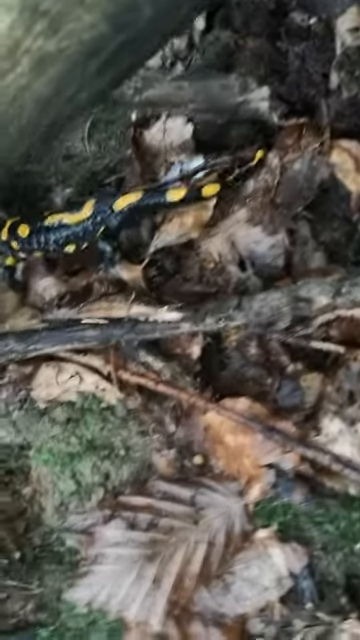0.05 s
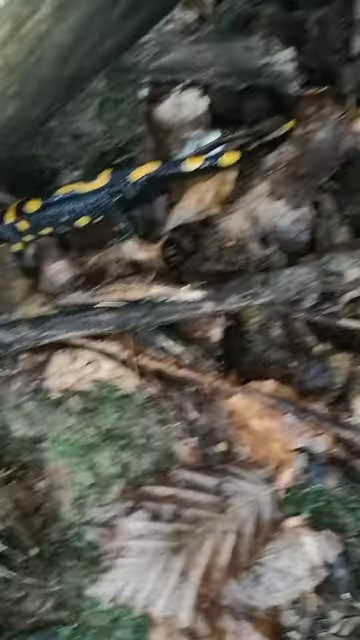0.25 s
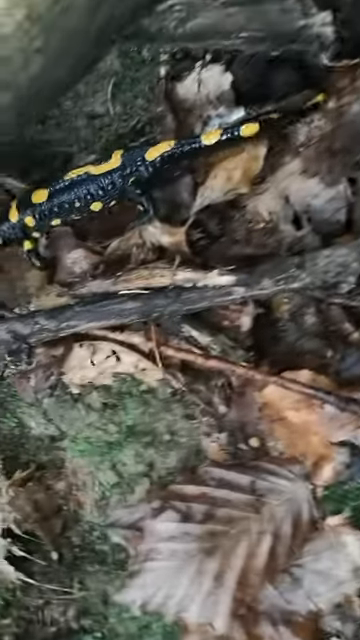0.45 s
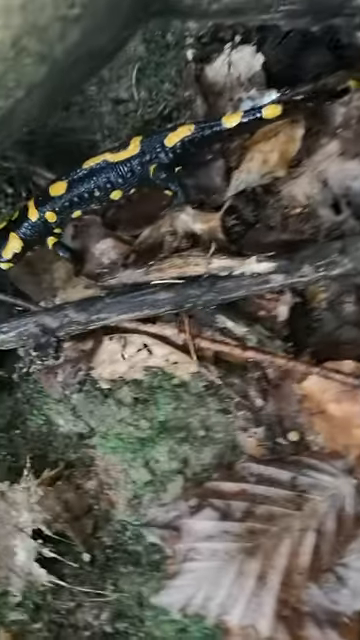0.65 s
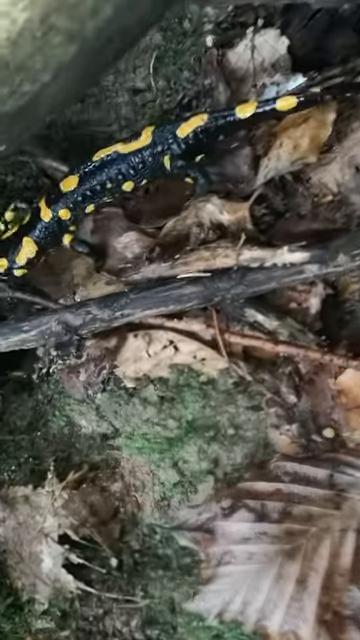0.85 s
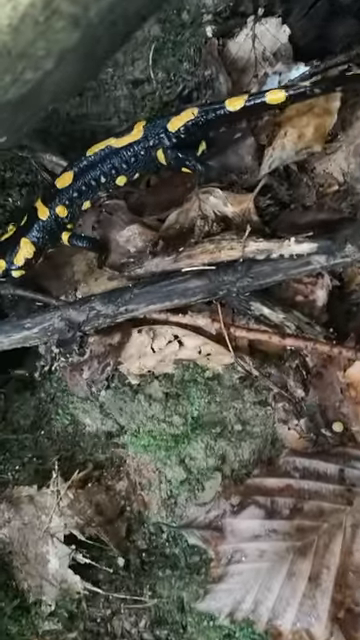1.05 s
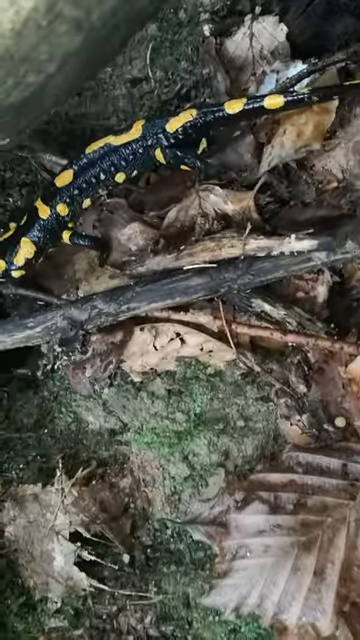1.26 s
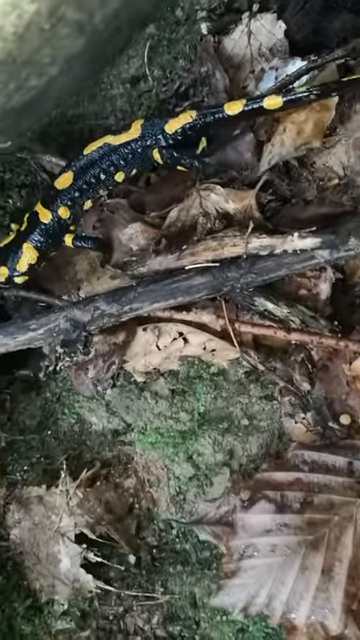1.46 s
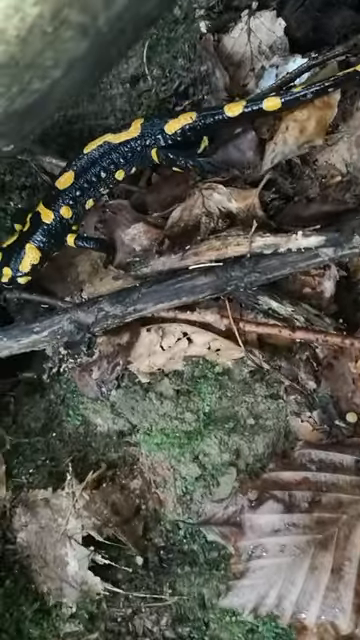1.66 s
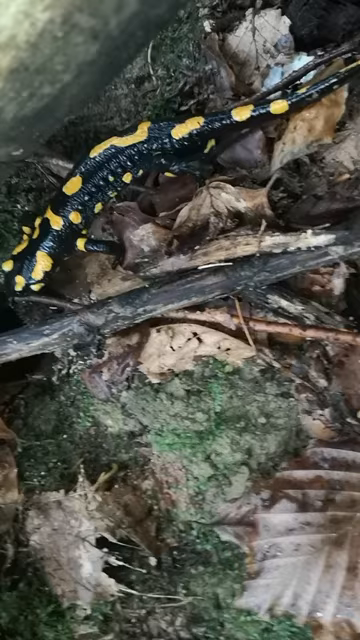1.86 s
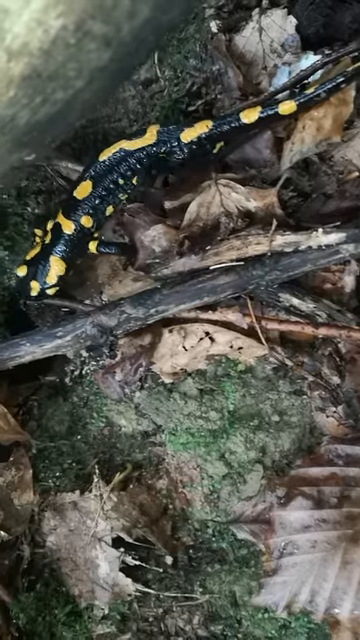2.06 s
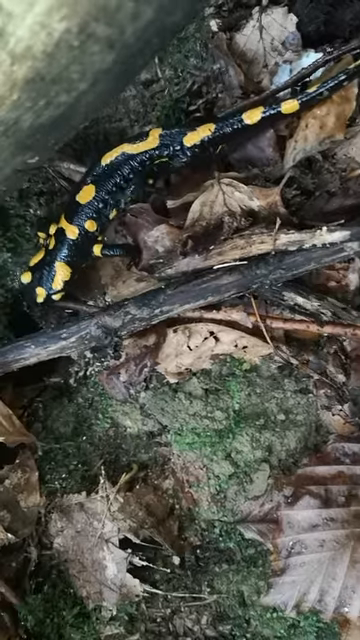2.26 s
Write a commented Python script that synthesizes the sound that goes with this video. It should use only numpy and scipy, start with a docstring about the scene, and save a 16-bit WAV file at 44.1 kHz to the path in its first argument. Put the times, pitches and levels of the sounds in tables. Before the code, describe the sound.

Dead leaves and twigs crackle close by as a salamander crawls over a quiet forest floor. A soft bump and a brief rustle come first, then a few sharp snaps and fainter ticks over a soft hiss.

```python
"""Dead leaves and twigs crackle close by on a quiet forest floor.
Each snap is a burst of tiny breaks that makes the leaf or twig ring briefly.
A soft bump and a rustle of shifting leaves come first; then the leaves settle with a few sharp snaps
and ever fainter ticks, over a soft hiss and a low rumble."""
import sys
import numpy as np
from scipy import signal
from scipy.fft import rfft, irfft
from scipy.io import wavfile
from scipy.ndimage import uniform_filter1d

SR = 44100
rng = np.random.default_rng(int(sys.argv[2]) if len(sys.argv) > 2 else 0)


def pcm_store(signal):
    """Save signal as 16-bit PCM."""
    levels = np.round(np.clip(np.atleast_2d(signal), -1, 1) * 32767)
    wavfile.write(sys.argv[1], SR, levels.astype(np.int16).T)


N = 105840

# Tone of the still forest air and of the rumble: pitch_hz, level_db
AIR_TONE = [(200, 6), (300, 0), (500, -2), (700, -5.5), (1100, -1.5), (1750, 2), (2500, 0), (3500, -7),
            (6000, -14), (7800, -14), (9200, -21), (12000, -18.5), (15500, -18.5)]
RUMBLE_TONE = [(10, -15), (32, 4.5), (55, 0.5), (90, -2.5), (140, -4), (200, -12), (280, -19), (450, -42),
               (1000, -71)]
# How much louder the air is on the left: pitch_hz, pan_db
AIR_PAN = [(300, 1), (800, -5.5), (2000, 1.5), (4000, 0.5), (7500, 13), (12000, -3)]
# How the rumble swells and sinks: time_s, level_db
RUMBLE_LEVELS = [(0, -66), (.15, -61), (.45, -61.5), (.7, -63), (1.1, -60), (1.3, -67.5), (2.2, -64),
                 (2.4, -68)]
# Loudness of the rustle's low, middle and high parts: time_s, scuff_db, leaves_db, hiss_db
RUSTLE_LEVELS = [(0, -70.5, -79, -76.5), (0.081, -68, -64, -63), (.18, -59, -67, -66.5),
                 (.28, -56, -58, -62.5), (.36, -60.5, -63, -68.5), (0.521, -61.5, -62.5, -67.5),
                 (.61, -69.5, -66, -65.5), (.71, -66, -65, -64), (.8, -66, -68, -68.5),
                 (1.0, -74.5, -68.5, -71.5), (1.2, -81, -76.5, -76.5), (1.6, -83, -81, -77.5),
                 (2.4, -91, -96, -82.5)]
# Tone of those parts, with one hiss for sliding leaves and one for settling: pitch_hz, level_db
SCUFF_TONE = [(120, 1.5), (280, 4), (390, -6.5), (540, -2), (850, -12.5), (1400, -12.5), (3000, -64)]
LEAVES_TONE = [(400, -53), (900, -7), (1300, 2), (1800, 2.5), (2500, -1), (3600, -7.5), (6000, -59),
               (12000, -24.5)]
SLIDING_HISS_TONE = [(1500, -27), (3500, -11), (5300, 3.5), (6200, 0), (7600, 0), (8500, -3), (9300, 0.5),
                     (10300, -14), (15500, -28)]
SETTLING_HISS_TONE = [(1500, -15.5), (3500, -7.5), (5400, -2.5), (6500, -2.5), (7600, 3), (8500, -3.5),
                      (10000, -13), (15500, -33)]
# Dull bumps on the soft ground: start_s, pitch_hz, level_db, rise_s, fade_s (time to drop 60 dB)
THUDS = [(0.059, 130, -44.5, 0.0019, 0.033), (0.22, 210.4, -32, 0.0024, 0.082),
         (0.2202, 117, -28.5, 0.0044, 0.13), (.227, 77.8, -17.5, 0.024, 0.15),
         (0.538, 166, -42, 0.0027, 0.062), (.671, 382, -40.5, .0004, 0.0061),
         (0.7398, 353, -37.5, 0.00092, 0.011), (1.0555, 162, -23.5, 0.0018, 0.015),
         (1.327, 477, -51, 0.0014, 0.022), (1.327, 213, -49.5, 0.0011, 0.036),
         (2.362, 183, -53, .001, 0.061)]
# One row per breaking leaf or twig: start_s, ring_hz, knock_db, body_db, crack_db, top_db, pan_db
SNAPS = [(0.0718, 1040, -20.5, -28, -51, -49, 7), (.084, 1670, -23, -26.5, -44, -45, 6),
         (0.2031, 6500, -46, -28, -35, -31, 12), (0.2198, 1490, -20, -19.5, -59, -50, -23),
         (.2456, 7500, -39, -34, -31, -30, 9), (0.2664, 2010, -23.5, -11, -25, -27, 3),
         (0.2986, 2030, -31, -7.5, -35, -27, 8), (0.32, 1570, -34, -10, -25, -36, 2),
         (0.3566, 2100, -35, -23.5, -31, -42, 10), (0.389, 2010, -25, -15.5, -30, -36, 6),
         (0.4017, 1840, -31, -17, -24.5, -40, 12), (0.4383, 2140, -24, -26, -27.5, -26.5, 11),
         (.491, 3020, -48, -18, -22, -44, 0), (0.5408, 1070, -23.5, -28, -30, -46, -1),
         (0.6498, 1700, -35, -21.5, -22, -38, 8), (.671, 7800, -13, -7.5, -7, -8, 9.5),
         (.8539, 2560, -29.5, -25, -29.5, -48, 7), (0.8917, 2730, -42, -14.5, -22.5, -25, 8.5),
         (1.005, 2030, -43, -27, -42, -44, 1), (1.0161, 1810, -52, -32, -36, -38, 10),
         (1.0545, 1730, 0, 3, -3.5, -4.5, 5), (1.0692, 1830, -25, -15, -17, -16, 1),
         (1.0958, 4050, -46, -36, -28, -29.5, 8), (1.117, 1580, -37, -28, -37, -33, 4),
         (1.1691, 4800, -46, -44, -31, -39.5, 6), (1.3268, 5700, -29, -29, -31, -25.5, 6),
         (1.664, 1980, -55, -39, -39, -53, 0), (1.6843, 6360, -52, -51, -47, -41.5, -8),
         (1.801, 2500, -54, -36, -36.5, -50, 2), (1.9385, 1870, -12.5, -13, -33.5, -29.5, 13.5),
         (2.0531, 3430, -49, -29.5, -41, -31, 4), (2.1466, 2340, -50, -36, -50, -45, 3),
         (2.2138, 2800, -56, -38, -38, -35.5, 6), (2.268, 1040, -34, -40, -50, -48, -2)]
# Where a snap's knock, body, crack and top lie: pitch_hz
SNAP_BANDS_HZ = [680, 1700, 4000, 7300]
# Peaks and dips in tone that all snaps share: pitch_hz, level_db
SNAP_TONE = [(100, -11), (370, -12.5), (560, -8), (820, -1.5), (1000, -2.5), (1220, 1.5), (1450, 0),
             (1870, 2), (2400, -4.5), (3150, -3.5), (3720, 3), (4250, -2), (4900, 3.5), (5500, -1),
             (6700, -1), (7600, 3), (8400, -8.5), (10000, -14.5), (12500, -15), (15500, -17.5)]

CONTACTS_PER_S, CONTACT_SPREAD_DB, CONTACT_LIMIT_DB, CONTACT_SHARE = 900, 7, 11, 0.65
SLIDE_END_S, SLIDE_FADE_S = 0.51, 0.2
THUD_LEFT_LAG_S, SNAP_LEFT_LAG_S = 0.00067, 0.00012
ECHO_DB, ECHO_FADE_S = -19.5, 0.26
BURST_S, RING_S, RING_DB = 0.0019, 0.0064, -13.5
PEAK_DB, PEAK_WIDTH_OCTAVES = 6, 0.16  # the boost around each snap's own ring_hz
SHEEN_FROM_HZ, FULL_PAN_HZ = 8500, 1780


def gain(db):
    """Turns decibels into a number to multiply by."""
    return 10 ** (np.asarray(db) / 20)


def normalise(x):
    """Scales a sound to an average strength (rms) of 1."""
    return x / np.sqrt(np.mean(x ** 2) + 1e-20)


def curve_at(points, hz):
    """Reads between the rows of a table, with pitch spaced in octaves."""
    pitches, values = np.transpose(points)
    return np.interp(np.log(hz + 1), np.log(pitches + 1), values)


def pan(pan_db):
    """Left and right gains; above zero, the left is louder."""
    return gain(np.array([[.5], [-.5]]) * pan_db)


def add(mix, start_s, sound):
    """Mixes a sound in at its start time."""
    part = mix[:, round(start_s * SR):][:, :sound.shape[-1]]
    part += sound[..., :part.shape[1]]


def noise(alike, size=N):
    """White noise for left and right, from unrelated (alike=0) to identical (1)."""
    left, other = rng.standard_normal((2, size))
    return np.array([left, alike * left + np.sqrt(1 - alike ** 2) * other])


def with_tone(x, tone):
    """Shapes a long noise with a tone table, at strength 1."""
    gains = gain(curve_at(tone, np.fft.rfftfreq(N, 1 / SR)))
    return normalise(irfft(rfft(x) * gains, N))


def ringing_filter(level_db):
    """A filter with these levels that rings only after it is struck."""
    log_gain = np.log(gain(np.concatenate([level_db, level_db[:, -2:0:-1]], 1)))
    return np.exp(np.conj(signal.hilbert(log_gain)))[:, :level_db.shape[1]]


def forest_air():
    """Still air: a soft, steady hiss."""
    hiss = with_tone(noise(alike=0.1), AIR_TONE)
    sides = pan(curve_at(AIR_PAN, np.fft.rfftfreq(N, 1 / SR)))
    return gain(-71) * irfft(rfft(hiss) * sides, N)


def rumble():
    """A deep noise that gently swells and sinks."""
    level_db = np.interp(np.arange(N) / SR, *np.transpose(RUMBLE_LEVELS))
    return gain(level_db) * with_tone(noise(alike=0.97), RUMBLE_TONE)


def leaf_contacts():
    """Leaves touch in countless tiny ticks over a smooth rubbing noise."""
    strength_db = np.minimum(CONTACT_SPREAD_DB * rng.exponential(1, N), CONTACT_LIMIT_DB)
    touches = gain(strength_db) * (rng.random(N) < CONTACTS_PER_S / SR)
    kicks = touches * noise(alike=0.36)
    one_tick = np.exp(-np.arange(256) / SR / 0.0012) * noise(alike=0.36, size=256)
    spectrum = rfft(signal.oaconvolve(kicks, one_tick, axes=1)[:, :N])
    power = uniform_filter1d(abs(spectrum) ** 2, size=400, axis=1)
    ticks = normalise(irfft(spectrum / np.sqrt(power), N))  # equally strong at all pitches
    return np.sqrt(CONTACT_SHARE) * ticks + np.sqrt(1 - CONTACT_SHARE) * noise(alike=0.1)


def rustle():
    """Fallen leaves shift under a weight and slowly come to rest."""
    t = np.arange(N) / SR
    times_s, *levels_db = np.transpose(RUSTLE_LEVELS)
    scuff_gain, leaves_gain, hiss_gain = (gain(np.interp(t, times_s, db)) for db in levels_db)
    contacts = leaf_contacts()
    fizz = gain(-1) * contacts + noise(alike=0.05)
    settled = np.clip(.5 + (t - SLIDE_END_S) / SLIDE_FADE_S, 0, 1)
    hiss = (1 - settled) * with_tone(fizz, SLIDING_HISS_TONE)
    hiss += settled * with_tone(fizz, SETTLING_HISS_TONE)
    scuff = scuff_gain * pan(-2) * with_tone(noise(alike=0.017), SCUFF_TONE)
    leaves = leaves_gain * pan(1) * with_tone(contacts, LEAVES_TONE)
    return scuff + leaves + hiss_gain * pan(1.5) * hiss


def thuds():
    """Each bump is a low swing that the soft ground quickly stops."""
    out = np.zeros((2, N))
    t = np.maximum(np.arange(SR // 4) / SR - np.array([[THUD_LEFT_LAG_S], [0]]), 0)
    for start_s, pitch_hz, level_db, rise_s, fade_s in THUDS:
        loudness = gain(level_db) * (1 - np.exp(-t / rise_s)) * np.exp(-np.log(1000) * t / fade_s)
        add(out, start_s, loudness * np.sin(2 * np.pi * pitch_hz * t))
    return out


def forest_echo(sound):
    """The ground and trunks scatter back a faint, short, thin echo."""
    t = np.arange(SR // 2) / SR
    tail = noise(alike=0.11, size=len(t)) * np.exp(-np.log(1000) * t / ECHO_FADE_S)
    tail *= np.minimum(t / 0.0034, 1)
    tail /= np.linalg.norm(tail[0])
    thin = signal.sosfilt(signal.butter(1, 1500, "high", fs=SR, output="sos"), sound)
    return gain(ECHO_DB) * signal.fftconvolve(thin, tail, axes=1)[:, :N]


def snap(ring_hz, bands_db, pan_db, size=2048):
    """A burst of tiny breaks rings in one leaf or twig; its high notes lean to one side."""
    t, hz = np.arange(size) / SR, np.fft.rfftfreq(size, 1 / SR)
    loudness = np.exp(-(t / BURST_S) ** 2.9) + gain(RING_DB) * np.exp(-t / RING_S)
    burst = rfft(noise(alike=0.6, size=size) * loudness)
    # The burst's own chance peaks and dips are evened out below.
    power = uniform_filter1d(abs(burst) ** 2, size=20, axis=1)
    uneven_db = 10 * np.log10(uniform_filter1d(power, size=14, axis=1))
    peak_db = PEAK_DB * np.exp(-(np.log2((hz + 1) / ring_hz) / PEAK_WIDTH_OCTAVES) ** 2)
    # A snap with more top than body also gets more of the very highest notes.
    _, body_db, _, top_db = bands_db
    sheen_db = 0.4 * (top_db - body_db) * np.clip(2 * np.log2((hz + 1) / SHEEN_FROM_HZ), 0, 1)
    tone_db = curve_at(list(zip(SNAP_BANDS_HZ, bands_db)), hz) + curve_at(SNAP_TONE, hz)
    level_db = tone_db + peak_db + sheen_db - uneven_db + 2
    lean_db = np.array([[.5], [-.5]]) * pan_db * np.minimum(hz / FULL_PAN_HZ, 1) ** 4
    ringing = irfft(burst * ringing_filter(level_db + lean_db - abs(lean_db) / 2))
    left, right = ringing * np.linspace(1, 0, size)
    return np.array([np.roll(left, round(SNAP_LEFT_LAG_S * SR)), right])


def crackles():
    """Leaves and twigs break one by one, in sharp snaps and faint ticks."""
    out = np.zeros((2, N))
    for start_s, ring_hz, *bands_db, pan_db in SNAPS:
        add(out, start_s - BURST_S / 8, snap(ring_hz, bands_db, pan_db))
    return out


def scene():
    """Crackles and their echo, over thuds, rustle, air and rumble."""
    snaps = crackles()
    return snaps + forest_echo(snaps) + thuds() + rustle() + forest_air() + rumble()


def record(dry):
    """Cuts away the highest treble, above 15750 Hz."""
    low_pass = signal.firwin(511, 15750, window=("kaiser", 9), fs=SR)
    return signal.oaconvolve(dry, low_pass[None], "same", axes=1)


dry = scene()
out = record(dry)
pcm_store(out)
```